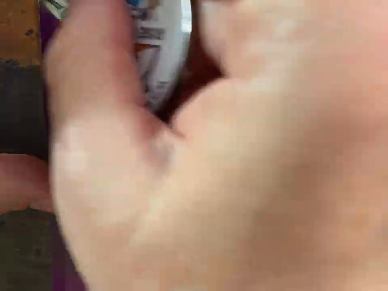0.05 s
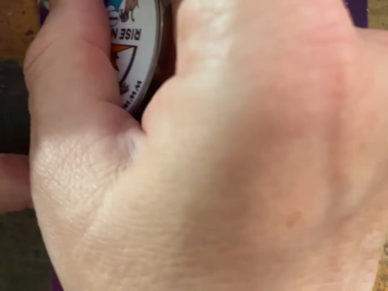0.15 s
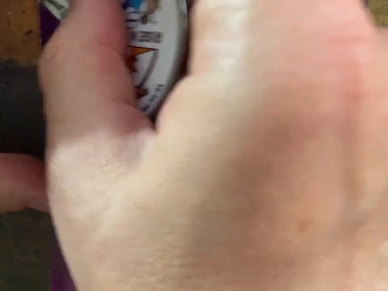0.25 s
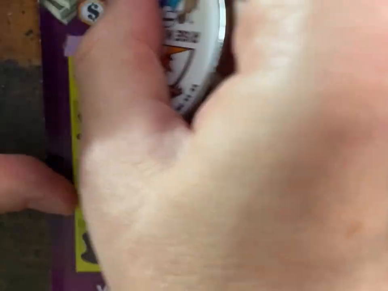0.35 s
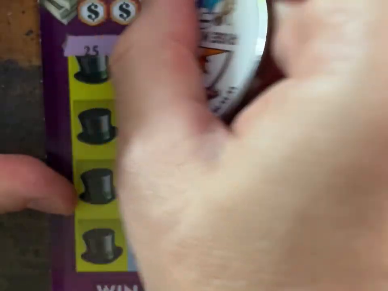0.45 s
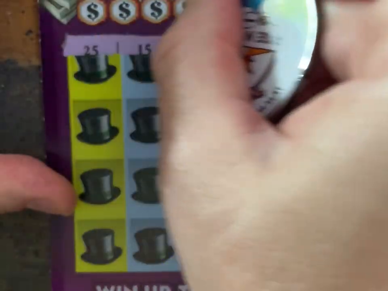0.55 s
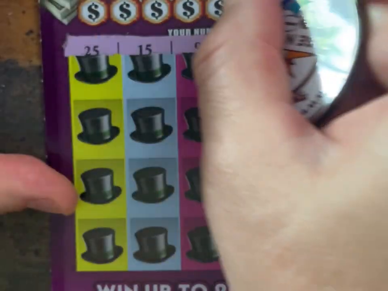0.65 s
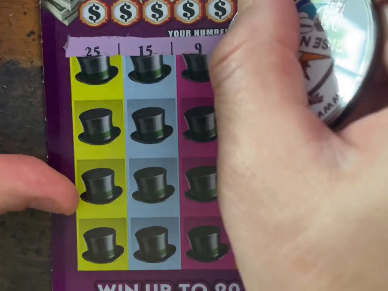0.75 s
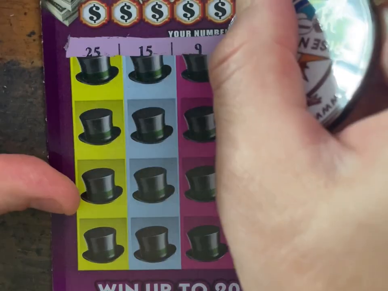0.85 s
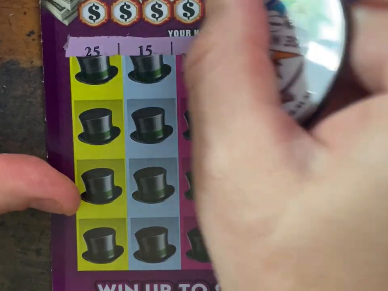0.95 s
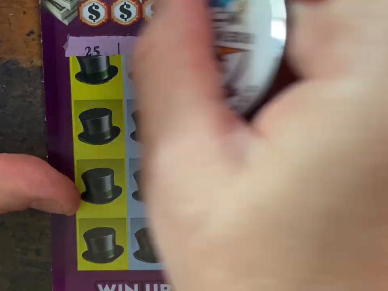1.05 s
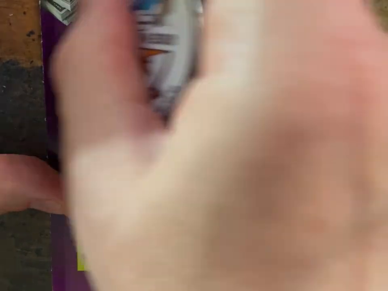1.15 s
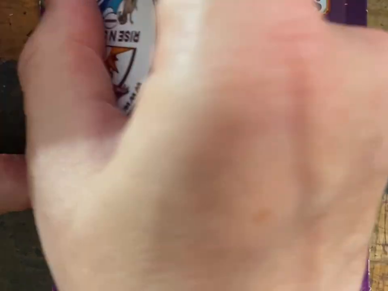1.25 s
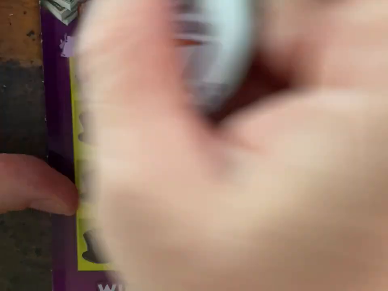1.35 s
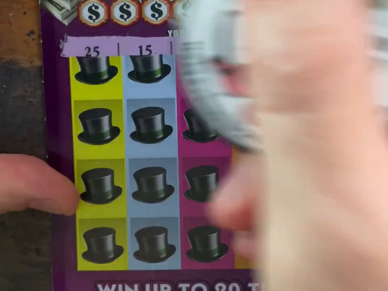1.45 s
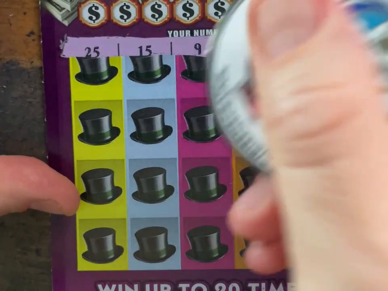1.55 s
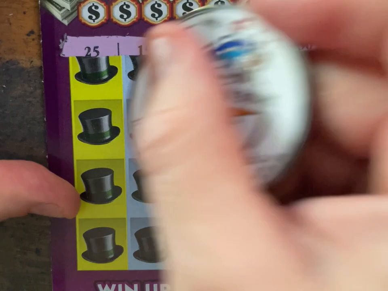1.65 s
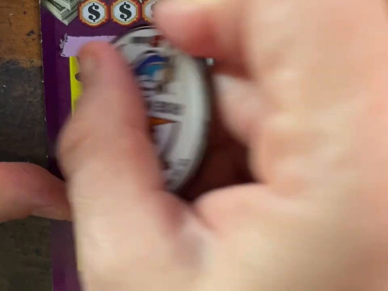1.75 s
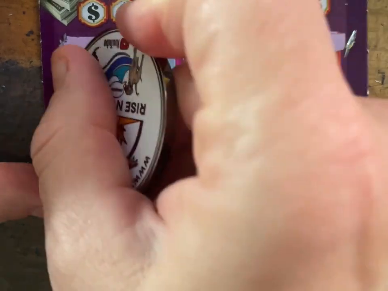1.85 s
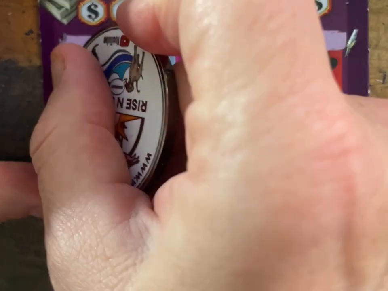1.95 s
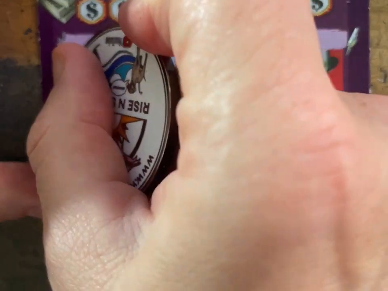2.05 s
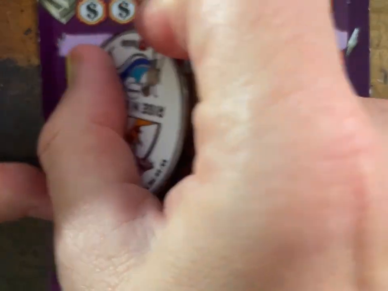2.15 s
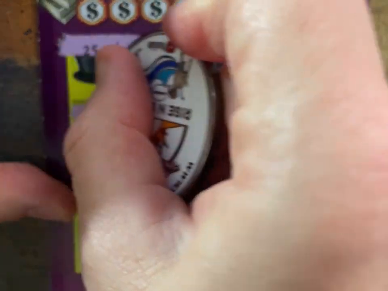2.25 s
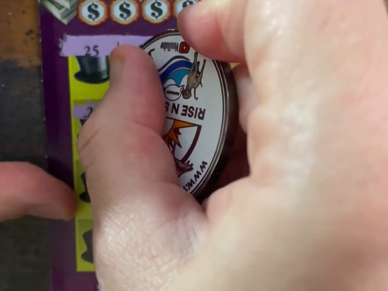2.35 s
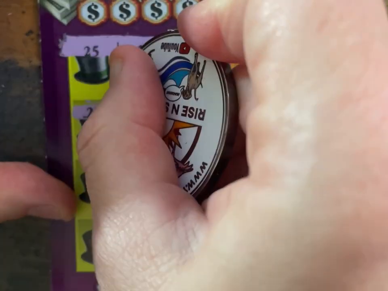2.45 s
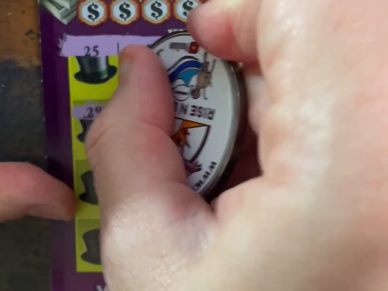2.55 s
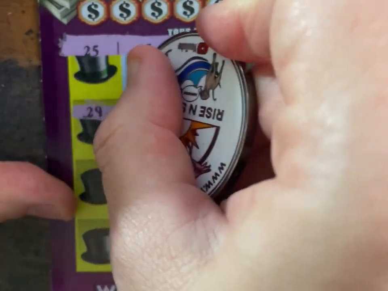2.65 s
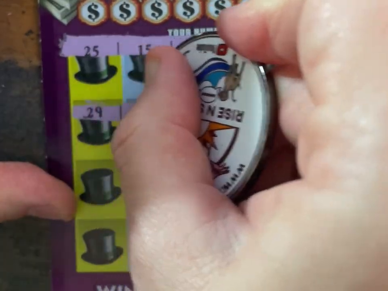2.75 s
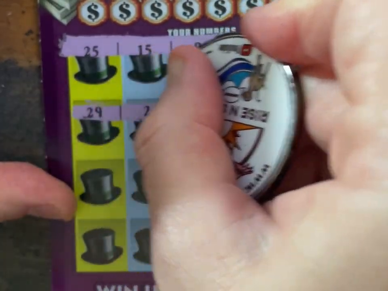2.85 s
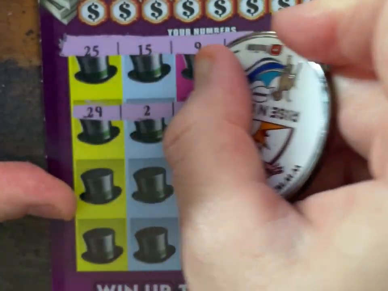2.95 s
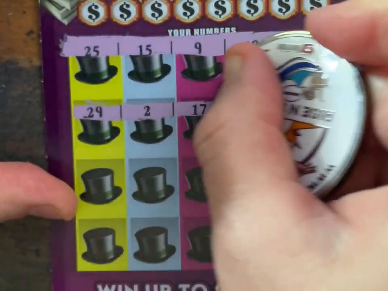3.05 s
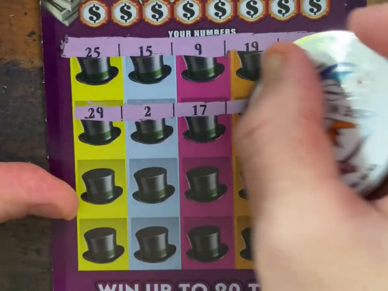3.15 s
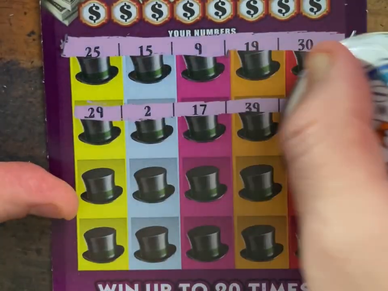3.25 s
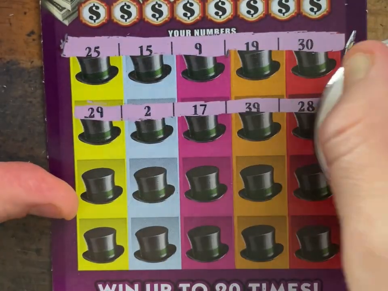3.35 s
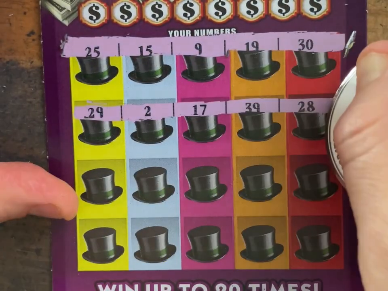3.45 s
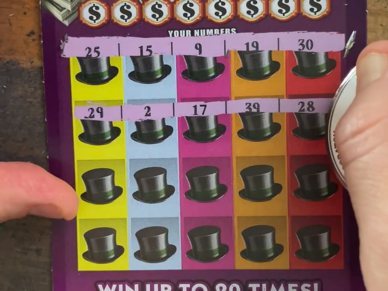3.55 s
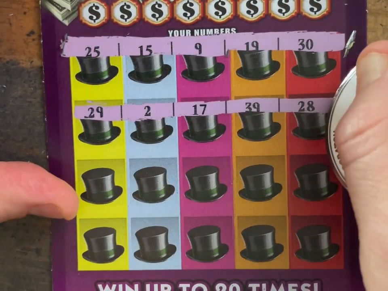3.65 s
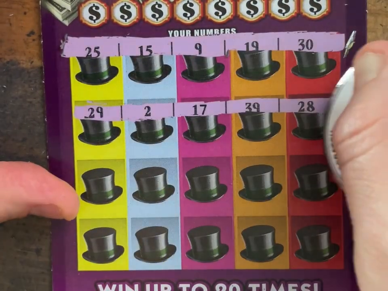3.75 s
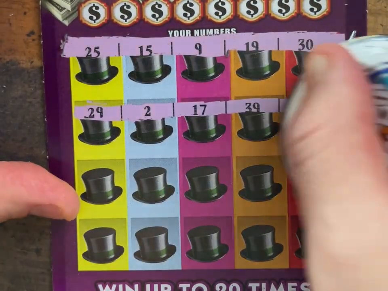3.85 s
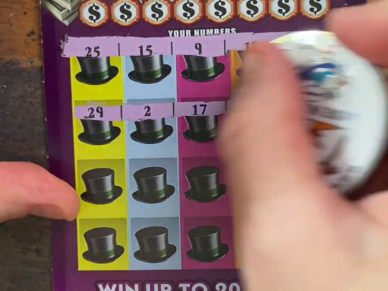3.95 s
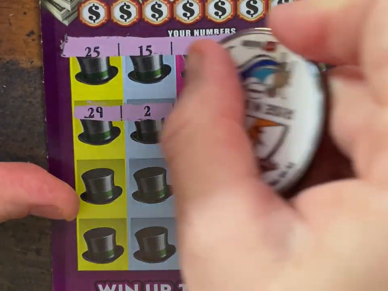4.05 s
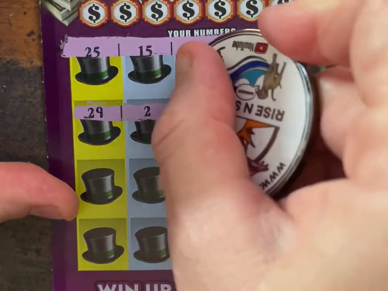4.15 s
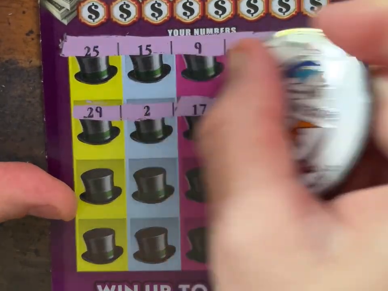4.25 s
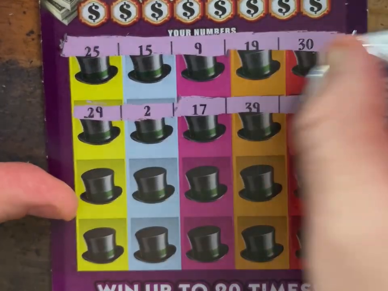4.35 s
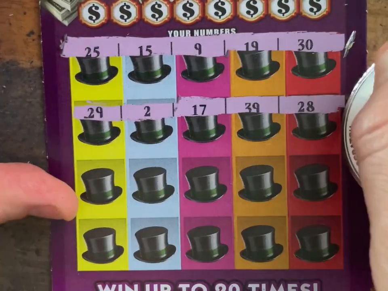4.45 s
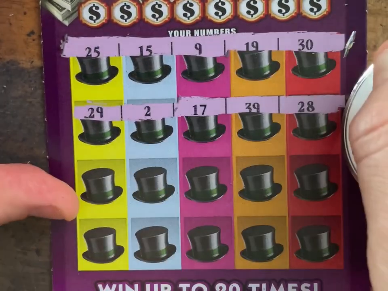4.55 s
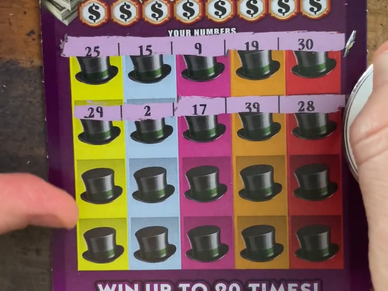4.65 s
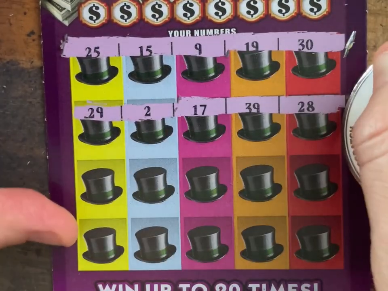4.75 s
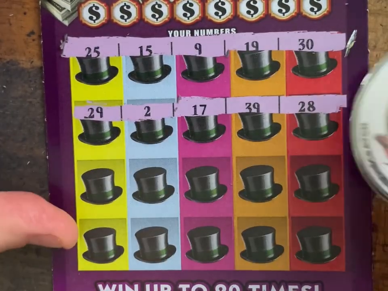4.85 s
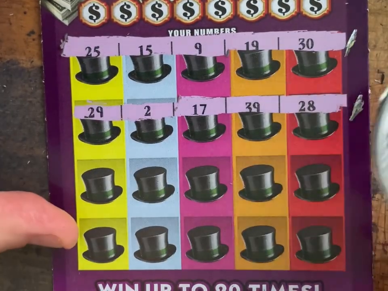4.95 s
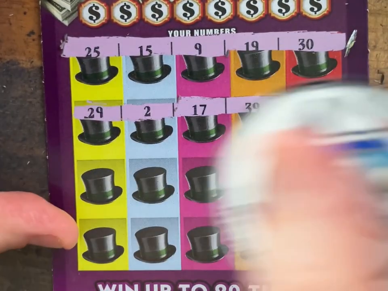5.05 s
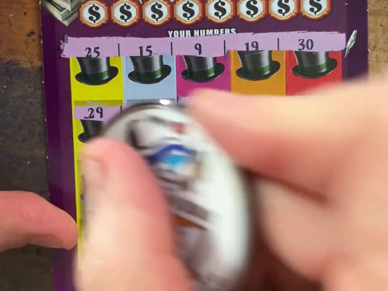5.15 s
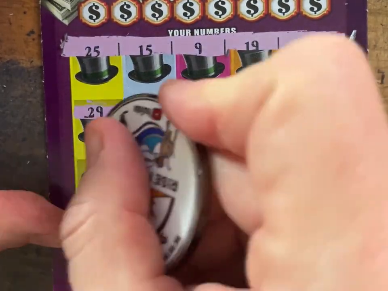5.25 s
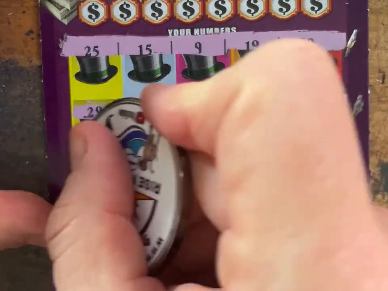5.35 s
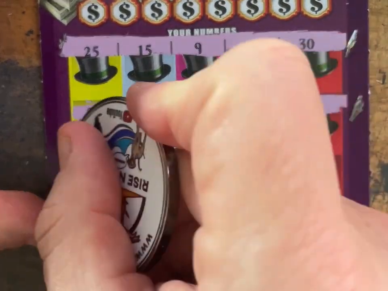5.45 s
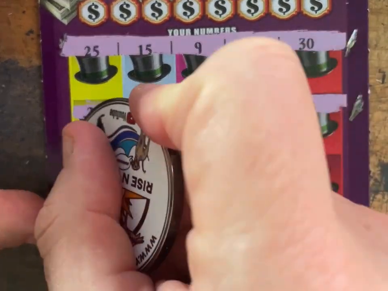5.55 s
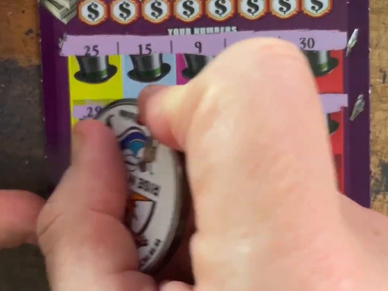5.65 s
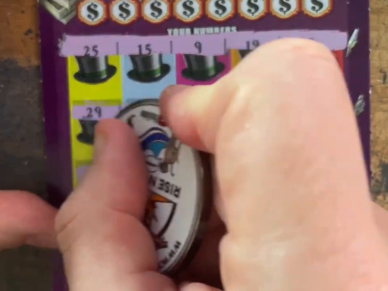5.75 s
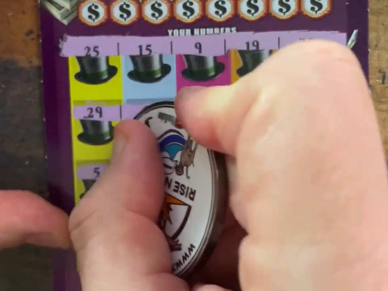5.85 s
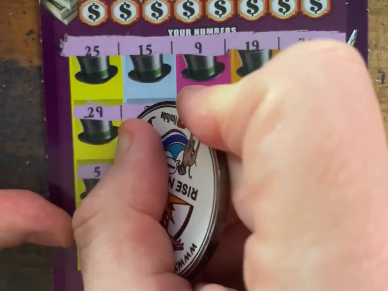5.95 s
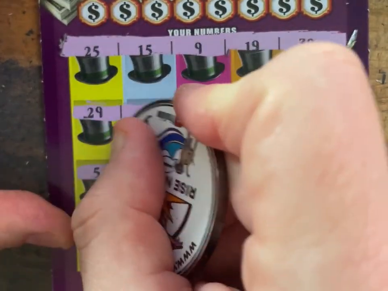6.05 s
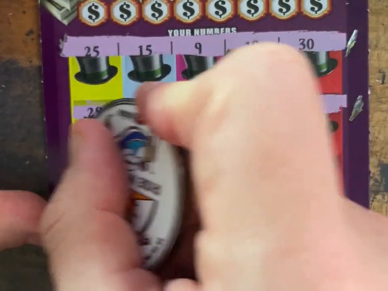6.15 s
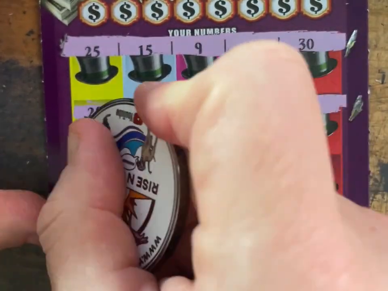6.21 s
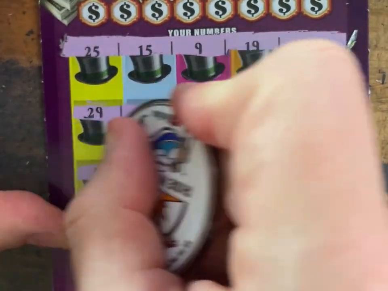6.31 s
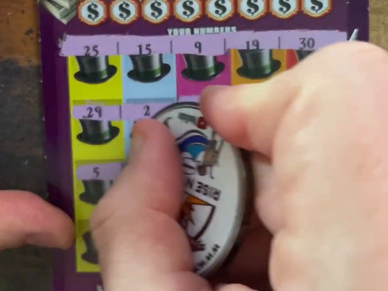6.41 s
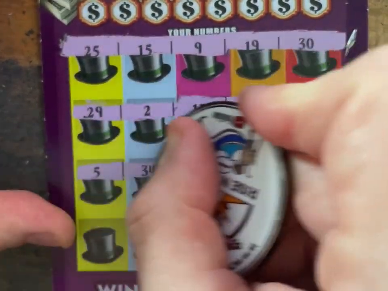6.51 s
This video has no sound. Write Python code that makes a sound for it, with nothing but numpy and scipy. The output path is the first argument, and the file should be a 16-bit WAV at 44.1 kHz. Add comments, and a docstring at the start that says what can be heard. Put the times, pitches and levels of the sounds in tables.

```python
"""A large coin scratches the coating off a paper ticket on a wooden table, close up in a quiet room.
Over faint room noise a hand brushes the paper, a soft hiss; the coin ticks (noise cracks) and knocks (table modes).
Nine strokes follow: forward ones cut the coating with a bright rasp, return ones drag dully. Random grains shake
resonances of table, card and coin edge, so the table thrums, the card's note glides and the rim rings.
More ticks, knocks and hand slides fall among the strokes, and two microphones hear it all."""
import sys
import numpy as np
from scipy import signal
from scipy.fft import rfft, irfft, next_fast_len
from scipy.io import wavfile
from scipy.ndimage import uniform_filter1d

SR = 44100
rng = np.random.default_rng(int(sys.argv[2]) if len(sys.argv) > 2 else 0)


def unload_wav(signal):
    """Save mono or channel-first audio to the path in sys.argv[1] as 16-bit WAV at rate SR, clipped to [-1, 1]."""
    wavfile.write(
        sys.argv[1],
        SR,
        np.round(np.clip(np.atleast_2d(signal).T, -1, 1) * 32767).astype(np.int16),
    )


N = 290178
TIME = np.arange(N) / SR
SIZE = next_fast_len(N + SR // 2)
HZ = np.maximum(np.arange(SIZE // 2 + 1) * SR / SIZE, 1)
CUTOFF_HZ = 16000  # top of the heard band

# the coin meets the table, or comes to a stop on it; levels before the trim of the knock layer:
# (start_s, level_db)
COIN_LANDINGS = [(0.119, -27), (0.132, -48), (1.239, -47), (2.158, -45), (2.332, -48.5), (3.411, -42.5),
                 (4.397, -37), (5.398, -28.5), (5.409, -42)]
# colour of each stroke, the fourth in two parts, from the coin's tilt and place;
# drag to rim levels apply at a firm bite, rumble and thrum are ceilings at full grip:
# (hand_rumble_db, table_thrum_db, card_drag_db, cutting_rasp_db, edge_hiss_db, rim_ring_db,
#  fastest_s, hiss_swell_db, note_start_hz, note_end_hz)
STROKE_COLOURS = [ (-66.5, -46.5, -43, -47, -55, -59, 0.59, 0.5, 5650, 4650),
                  (-62.5, -43.5, -38.5, -55.5, -58.5, -67, 1.19, 6, 5250, 5850),
                  (-57.5, -45.5, -41.5, -41.5, -53.5, -51, 2.18, -1, 5100, 5600),
                  (-53, -45.5, -43.5, -45, -58, -56, 2.56, 4, 6400, 5750),
                  (-66.5, -48, -44, -45, -58.5, -55.5, 3.214, 8, 5650, 4700),
                  (-68.5, -45.5, -40.5, -53.5, -55, -65.5, 4.03, 4, 4500, 6800),
                  (-71.5, -49, -41.5, -47, -53.5, -54.5, 4.33, 7.5, 5200, 4300),
                  (-69, -46.5, -43.5, -44, -57.5, -57.5, 5.69, 0.5, 5650, 5700),
                  (-65.5, -45.5, -39.5, -56.5, -73, -72.5, 6.16, 22, 11000, 4100),
                  (-62.5, -47, -43, -42, -55.5, -55, 6.55, 4.5, 6100, 5600), ]
# how hard the rim bites into the coating, one curve a stroke, two for the fourth: (time_s, bite_db)
BITE_CURVES = [
    [(0.19, -59), (0.202, -62.5), (0.276, -43), (0.32, -52.5), (0.37, -48), (0.614, -43.5), (0.718, -51),
     (0.744, -71), (0.8, -78)],
    [(0.86, -84), (0.868, -65.5), (0.904, -45.5), (1.028, -39.5), (1.13, -35.5), (1.138, -38.5),
     (1.178, -37), (1.22, -49), (1.33, -79.5)],
    [(2.09, -77), (2.108, -41), (2.134, -45), (2.15, -58), (2.158, -40.5), (2.294, -47.5), (2.336, -62.5),
     (2.41, -80)],
    [(2.505, -95), (2.515, -50.5), (2.523, -42), (2.551, -46), (2.575, -52), (2.61, -56)],
    [(2.61, -60), (2.67, -46), (3.002, -40.5), (3.066, -45), (3.07, -40.5), (3.294, -40.5), (3.428, -51),
     (3.456, -64), (3.52, -81)],
    [(3.748, -72), (3.766, -50), (3.974, -38.5), (3.982, -42), (4.036, -42), (4.06, -46), (4.076, -44),
     (4.124, -62), (4.15, -74.5)],
    [(4.15, -77), (4.178, -58), (4.258, -41), (4.344, -40.5), (4.36, -39.5), (4.392, -39.5), (4.398, -40.5),
     (4.428, -52), (4.54, -73)],
    [(5.622, -78), (5.63, -59), (5.648, -43.5), (5.716, -42), (5.74, -48.5), (5.804, -43), (5.872, -49),
     (5.89, -62), (5.96, -84)],
    [(6.045, -71), (6.057, -53), (6.093, -50.5), (6.123, -42.5), (6.161, -50), (6.173, -57), (6.22, -74)],
    [(6.22, -80), (6.27, -51), (6.354, -43), (6.398, -46.5), (6.466, -40.5), (6.474, -40.5), (6.512, -41),
     (6.53, -43.5), (6.58, -42.5)],
]


def from_db(db):
    """Decibels to gain."""
    return 10 ** (np.asarray(db) / 20)


def rms_one(x):
    """Scale to unit power."""
    return x / np.sqrt(np.mean(x ** 2) + 1e-20)


def at_hz(points):
    """Read a table along log frequency."""
    hz, value = np.transpose(points)
    return np.interp(np.log(HZ), np.log(hz), value)


def colour(x, gain):
    """Filter a steady sound by a gain per frequency; unit power."""
    return rms_one(irfft(rfft(x, SIZE) * gain, SIZE)[:N])


def resonances(modes):
    """Gain per frequency of overlapping damped resonances, their powers added."""
    peaks = [from_db(db) / (1 + ((HZ - hz) / half_width) ** 2) for hz, half_width, db in modes]
    return np.sqrt(sum(peak ** 2 for peak in peaks))


def drift(rate_hz):
    """Smooth chance with spread 1, slower for a lower rate."""
    return colour(rng.standard_normal(N), 1 / (1 + (HZ / rate_hz) ** 2))


def grains(per_s, spread_db):
    """Tiny impulses at random moments, of either sign and uneven size, like fractures of a coating."""
    sizes = from_db(spread_db * np.minimum(rng.exponential(1, N), 5)) * rng.choice([-1, 1], N)
    return sizes * (rng.random(N) < per_s / SR)


def ring(clicks, hz, t60):
    """A unit click sets a decaying sine of height 1 ringing; t60 in seconds."""
    radius = from_db(-60 / (t60 * SR))
    turn = 2 * np.pi * hz / SR
    return signal.lfilter([0, np.sin(turn)], [1, -2 * radius * np.cos(turn), radius ** 2], clicks + 1e-18)


def evened(x, span_s):
    """A steady push keeps the power even over a short span, leaving the fast grain."""
    return x / np.sqrt(uniform_filter1d(x ** 2, size=int(span_s * SR)) + 1e-9)


def rung_out(gain, fall_db_per_s):
    """A level that rises at once but falls no faster than a ring dies."""
    fall_db = fall_db_per_s * TIME
    level_db = 20 * np.log10(gain + 1e-9)
    return from_db(np.maximum.accumulate(level_db + fall_db) - fall_db)


def rumble_gain(lean):
    """The table rumbles a little under the resting hand, more under a stroke and after a knock."""
    rest_db, lean_fall_db_per_s = -74, 33.5  # the hand's weight eases off slowly after a stroke
    sway_db, sway_s = -28.5, 0.096  # relative to the knock's listed level; time to fall to 1/e
    sway = np.zeros(N)
    for start_s, level_db in COIN_LANDINGS:
        dying = np.exp(-np.abs(TIME - start_s) / sway_s)
        sway += from_db(level_db + sway_db) * (TIME > start_s) * dying
    return from_db(rest_db) + rung_out(lean, lean_fall_db_per_s) + sway


def room_tone(lean, waver_db):
    """Faint wavering room noise, and the low rumble of the hand leaning on the table."""
    # spectrum of the room noise: (pitch_hz, relative_db per Hz)
    air_spectrum = [(30, -0.5), (130, -1.5), (230, -7), (400, -14), (800, -23), (1600, -27), (4000, -33),
                    (9000, -36), (16000, -36.5)]
    # spectrum of the table's rumble: (pitch_hz, relative_db per Hz)
    rumble_spectrum = [(20, -33), (35, -9.5), (58, 8.5), (85, 1), (130, -8.5), (250, -41), (600, -78)]
    air_gain = from_db(-73.5 + waver_db * drift(rate_hz=5))
    air = air_gain * colour(rng.standard_normal(N), from_db(at_hz(air_spectrum)))
    rumble = colour(rng.standard_normal(N), from_db(at_hz(rumble_spectrum)))
    return air + rumble_gain(lean) * rumble


def slide_gain():
    """Each slide of the hand swells smoothly to its crest and fades."""
    # slides of skin over paper, levels before the trim of the hand layer; rise and fall are times to 1/e:
    # (crest_s, level_db, rise_s, fall_s)
    hand_slides = [(0.086, -66, 0.039, .025), (1.465, -56.5, 0.073, 0.074), (1.749, -85, 0.14, 0.2),
                   (2.0, -73.5, 0.048, 0.075), (4.68, -74, 0.063, 0.078), (4.941, -63, .055, 0.083),
                   (5.498, -66.5, 0.024, 0.024), (6.222, -69.5, 0.022, .02)]
    gain = np.zeros(N)
    for crest_s, level_db, rise_s, fall_s in hand_slides:
        width_s = np.where(TIME < crest_s, rise_s, fall_s)
        gain += from_db(level_db) * np.exp(-((TIME - crest_s) / width_s) ** 2)
    return gain


def hand(db):
    """Skin brushing the paper gives a soft hiss of very dense fine grains."""
    # spectrum of skin on paper: (pitch_hz, relative_db per Hz)
    skin_spectrum = [(900, -14.5), (1300, -8), (1900, -7), (3200, -5), (4800, -3), (7000, 1), (10000, -4.5),
                     (14000, -0.5), (16000, -4)]
    brush = colour(grains(per_s=51000, spread_db=5.5), from_db(at_hz(skin_spectrum)))
    return from_db(db) * slide_gain() * brush


def ticks(db, t60, tail_db, tail_t60, low_hz):
    """Each click is a brief crack with a faint tail and no bass; a softer contact is duller and longer."""
    # the rim clicks on the card or in the fingers, levels before the layer's trim:
    # (start_s, level_db, dulled_above_hz)
    rim_clicks = [(0.1127, -37, 15800), (0.121, -35.5, 10100), (1.313, -55, 16000), (1.501, -52, 12000),
                  (1.505, -41, 12000), (1.872, -44.5, 6000), (1.881, -53, 6000), (2.003, -44, 16000),
                  (2.171, -29.5, 16000), (2.33, -44.5, 12000), (2.614, -45, 12000), (4.785, -46, 12000),
                  (5.149, -63, 8000), (5.163, -49.5, 16000), (5.193, -41, 4970), (5.196, -40.5, 8000),
                  (5.391, -45, 6000), (5.397, -36.5, 16000)]
    # spectrum of a click: (pitch_hz, relative_db per Hz)
    click_spectrum = [(900, 0.5), (1500, -2.5), (2150, 6), (2700, -4), (3600, 0), (5000, -6), (6500, 3.5),
                      (10000, -3), (16000, 8.5)]
    cracks = np.zeros(N)
    age = TIME[:SR // 4]
    noise = colour(rng.standard_normal(N), from_db(at_hz(click_spectrum)))
    tail = from_db(tail_db - 60 * age / tail_t60)
    for start_s, level_db, dull_hz in rim_clicks:
        start = int(start_s * SR)
        during = slice(start, start + len(age))
        crack = from_db(-60 * age / (t60 * CUTOFF_HZ / dull_hz))
        dull = signal.butter(1, min(dull_hz, CUTOFF_HZ), fs=SR)
        cracks[during] += from_db(level_db + db) * signal.lfilter(*dull, (crack + tail) * noise[during])
    return signal.sosfilt(signal.butter(2, low_hz, "high", fs=SR, output="sos"), cracks)


def knocks(db, rise_s, first_hz, last_hz, crowd_db, crowd_t60, contact_hz):
    """The heavy coin thumps the table through the soft card: a bending wave, strong modes, a weak crowd."""
    # modes of the table top under a blow: (pitch_hz, level_db, t60_s)
    blow_modes = [(164.4, -19, 0.28), (235, -9.5, 0.27), (269, -18, 0.29), (317.3, -10, 0.12),
                  (378, -26.5, 0.25), (412, -44, 0.011), (487, -10.5, 0.058), (910, -19, 0.056),
                  (980, -27, 0.038), (1104, -17, 0.018), (1280, -16, 0.017)]
    blows = np.zeros(N)
    for start_s, level_db in COIN_LANDINGS:
        blows[int(start_s * SR)] = from_db(level_db + db)
    age = TIME[:SR // 2]
    # short bending waves travel faster, so the first arrival falls in pitch
    hz = last_hz + (first_hz - last_hz) * np.exp(-age / rise_s)
    swell = (age / rise_s * np.exp(1 - age / rise_s)) ** 2
    arrival = np.sin(2 * np.pi * np.cumsum(hz) / SR) * swell
    # many weak modes blur into a band of noise
    crowd_noise = colour(rng.standard_normal(N), resonances([(385, 173, 0)]))[:len(age)]
    crowd = crowd_noise * from_db(crowd_db - 60 * age / crowd_t60)
    thump = signal.fftconvolve(blows, arrival + crowd)[:N]
    for k, (mode_hz, level_db, t60) in enumerate(blow_modes):
        # neighbouring modes move in opposite directions
        thump += ring(blows, mode_hz, t60) * from_db(level_db) * (-1) ** k
    # the soft contact takes off the treble
    return signal.sosfilt(signal.butter(2, contact_hz, fs=SR, output="sos"), thump)


def stroke_gains():
    """One bite drives all levels: drag follows, rasp and hiss rise more steeply, thrum and rumble level off."""
    firm_bite_db = -40
    grip_db = -55  # drag at half of full grip; well above it thrum and rumble hardly grow
    rasp_per_bite, hiss_per_bite = 1.094, 1.405  # dB per dB
    rasp_swell, note_swell = 0.2, 1.2  # dB per dB of the hiss's swell
    swell_share = 0.17  # width of the burst of speed, as a share of the bite curve's length
    note_db = -7  # the card's note relative to the hiss
    gains = np.zeros((7, N))
    for curve, colours in zip(BITE_CURVES, STROKE_COLOURS):
        lean_db, thrum_db, drag_db, rasp_db, hiss_db, rim_db, fastest_s, swell_db, _, _ = colours
        s, bite_db = np.transpose(curve)
        during = (TIME >= s[0]) & (TIME < s[-1])
        extra_db = np.interp(TIME[during], s, bite_db) - firm_bite_db
        # the hiss swells (or dips) where the coin is fastest
        burst_s = swell_share * (s[-1] - s[0])
        speed_db = swell_db * np.exp(-((TIME[during] - fastest_s) / burst_s) ** 2)
        edge_db = hiss_per_bite * extra_db
        drag = from_db(drag_db + extra_db)
        grip = drag / (drag + from_db(grip_db))
        lean = grip * from_db(lean_db)
        thrum = grip * from_db(thrum_db)
        rasp = from_db(rasp_db + rasp_per_bite * extra_db + rasp_swell * speed_db)
        hiss = from_db(hiss_db + edge_db + speed_db)
        note = from_db(hiss_db + note_db + edge_db + note_swell * speed_db)
        ringing = from_db(rim_db + edge_db)
        gains[:, during] = lean, thrum, drag, rasp, hiss, note, ringing
    return uniform_filter1d(gains, size=200).clip(0)


def stick_slip_db(stick_s, slip_s, hush):
    """At a snag the scrape's level bends away as the rim sticks, then jumps the other way and settles."""
    # the rim sticks, then slips free; a negative surge reverses both: (slip_s, surge_db)
    rim_snags = [(0.869, 7.5), (0.956, 3), (2.107, -4), (2.154, 3.5), (2.628, 6), (2.662, 4), (3.763, 2.5),
                 (3.805, 6), (4.245, -1), (4.397, 10.5), (5.841, 11), (6.058, -1), (6.101, -3), (6.454, 1)]
    level_db = np.zeros(N)
    for snag_s, surge_db in rim_snags:
        age = TIME - snag_s
        side = np.where(age < 0, -hush, 1)
        level_db += surge_db * side * np.exp(-np.abs(age) / np.where(age < 0, stick_s, slip_s))
    return level_db


def scraping(thrum, drag, rasp, hiss):
    """The rim catches and slips on the coating; clumped grains shake table, card and coin edge together."""
    # resonances heard while scraping, of the table, the dragged card, the cut coating, fine grit
    # and the coin's edge; each: (pitch_hz, half_width_hz, relative_db)
    table_modes = [(116, 40, -15), (163, 23, -11), (231.2, 4.3, 3.5), (288, 64, -9), (397.2, 23, -5)]
    card_modes = [(519, 59, 2.5), (640, 102, 2), (767, 87, 4), (978, 25, 0)]
    rasp_modes = [(1082, 90, 3), (1270, 40, 3), (1397, 71, 1.5), (1586, 6.1, 2), (1840, 130, -5.5)]
    grit_modes = [(1856, 110, -0.5), (2170, 240, -1.3), (2562, 310, -1.5)]
    edge_modes = [(3740, 340, 0), (5000, 1110, -1.5), (7980, 1000, 1), (10590, 1500, -45.5),
                  (13000, 2100, -2)]
    catch = drift(rate_hz=69)

    def shaken(modes, db, per_s, spread_db, catch_db):
        """One set of resonances, fed with grains that come in clumps."""
        force = grains(per_s, spread_db) * from_db(catch_db * catch)
        return from_db(db) * evened(colour(force, resonances(modes)), span_s=0.077)

    table = thrum * shaken(table_modes, db=0.5, per_s=3000, spread_db=1.5, catch_db=2.0)
    card = drag * shaken(card_modes, db=0.05, per_s=4000, spread_db=1.5, catch_db=0.6)
    card += rasp * shaken(rasp_modes, db=-0.5, per_s=6000, spread_db=2.0, catch_db=0.6)
    # fine grit needs both a deep cut and a fast edge
    grit_gain = rasp ** 0.55 * hiss ** 0.52
    grit = grit_gain * shaken(grit_modes, db=-0.5, per_s=9000, spread_db=3.5, catch_db=1.0)
    edge = hiss * shaken(edge_modes, db=-1.0, per_s=9800, spread_db=0.5, catch_db=1.34)
    snagged = from_db(stick_slip_db(stick_s=0.025, slip_s=0.007, hush=0.32))
    return table + (card + grit + edge) * snagged


def card_note_hz():
    """The card's note glides evenly along each bite curve as the coin travels."""
    ends_s = [(curve[0][0], curve[-1][0]) for curve in BITE_CURVES]
    ends_hz = [colours[-2:] for colours in STROKE_COLOURS]
    return np.interp(TIME, np.ravel(ends_s), np.ravel(ends_hz))


def singing(note, ringing, card_width_hz):
    """Grains excite a card resonance that glides with the coin's place, and the fixed ring of the rim."""
    # resonance of the coin's rim: (pitch_hz, half_width_hz, relative_db)
    rim_modes = [(7060, 270, 0)]
    phase = 2 * np.pi * np.cumsum(card_note_hz()) / SR
    # slow noise on a cosine and a sine makes a noise band around the gliding pitch
    band = 1 / (1 + (HZ / card_width_hz) ** 2)
    card = np.zeros(N)
    for wave in (np.cos, np.sin):
        card += colour(grains(per_s=7000, spread_db=4.0), band) * wave(phase)
    rim = colour(grains(per_s=4300, spread_db=4.5), resonances(rim_modes))
    return note * card + ringing * rim


def friction_and_air():
    """Everything but the knocks; each call keeps the levels and draws fresh fine grain."""
    lean, thrum, drag, rasp, hiss, note, ringing = stroke_gains()
    # table and card ring on after the coin lets go, the card more briefly
    thrum = rung_out(thrum, fall_db_per_s=213.5)
    drag = rung_out(drag, fall_db_per_s=400.5)
    rasp = rung_out(rasp, fall_db_per_s=400.5)
    coin = scraping(thrum, drag, rasp, hiss)
    coin += singing(note, ringing, card_width_hz=450)
    coin += ticks(db=-3.0, t60=0.0078, tail_db=-23.5, tail_t60=0.21, low_hz=995)
    return coin + hand(db=-0.5) + room_tone(lean, waver_db=3.6)


def microphones(direct, diffuse):
    """Two ports share the direct sound with a phase and level offset; the diffuse sound sets them apart."""
    # phase by which the left leads: (pitch_hz, lead_rad)
    left_lead = [(0, 0), (650, .1), (900, -.5), (1100, -.15), (2240, .15), (2500, .55), (3200, .1),
                 (3550, .7), (4300, .35), (4750, 1.3), (5200, 0), (5600, .05), (9800, 3.1), (14800, 6.25),
                 (16100, 6.28)]
    # level of the left over the right: (pitch_hz, difference_db)
    left_tilt = [(100, 0), (230, .5), (470, -1), (640, 3.5), (860, 5), (950, -6), (1150, -1), (2000, 0),
                 (2700, .5), (3600, -2.4), (4400, -1), (4850, 3.5), (5200, 0), (16000, 0)]
    # likeness of the two sides: (pitch_hz, likeness_0_to_1)
    side_likeness = [(50, .998), (130, .988), (260, .97), (500, .97), (780, .98), (910, .75), (1050, .955),
                     (2200, .965), (2900, .88), (3600, .55), (4850, .65), (5400, .96), (6400, .87),
                     (7000, .96), (10000, .97), (16000, .85)]
    sides = np.array([[1], [-1]])
    alike = np.clip(at_hz(side_likeness), 0, 1)
    shared = np.sqrt((1 + alike) / 2) * rfft(direct, SIZE)
    apart = sides * np.sqrt((1 - alike) / 2) * rfft(diffuse, SIZE)
    # each side takes half of the offset
    lead_rad = np.interp(HZ, *np.transpose(left_lead))
    offset = np.exp(.5j * sides * lead_rad) * from_db(sides * at_hz(left_tilt) / 2)
    return irfft((shared + apart) * offset, SIZE)[:, :N]


def scene():
    """Coin, hand and room at the two microphones; the knocks are in the direct sound only."""
    thumps = knocks(db=2.2, rise_s=0.0019, first_hz=1183, last_hz=302,
                    crowd_db=-15.5, crowd_t60=0.23, contact_hz=1790)
    return microphones(direct=friction_and_air() + thumps, diffuse=friction_and_air())


def record(dry):
    """A very steep low-pass cuts the top."""
    top_cut = np.sqrt(1 + (HZ / CUTOFF_HZ) ** 200)
    return irfft(rfft(dry, SIZE) / top_cut, SIZE)[:, :N]


dry = scene()
out = record(dry)
unload_wav(out)
```